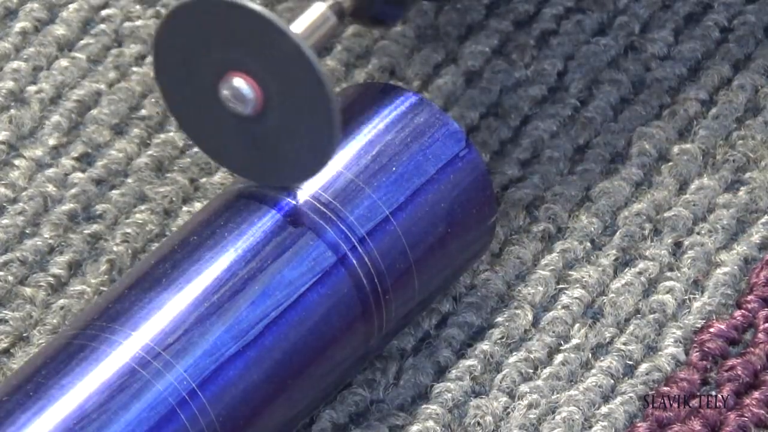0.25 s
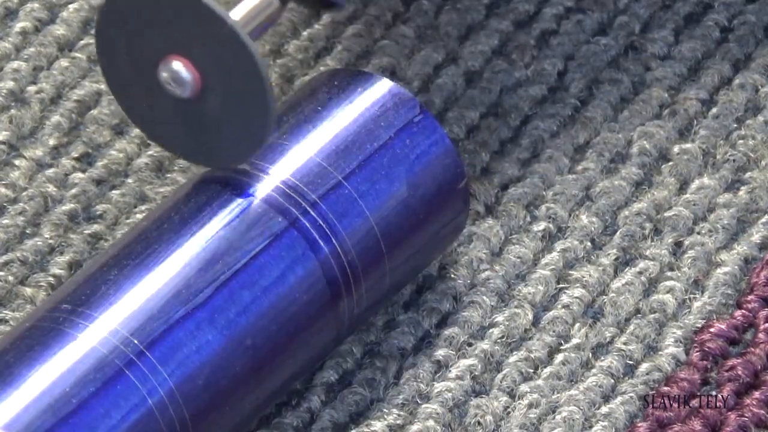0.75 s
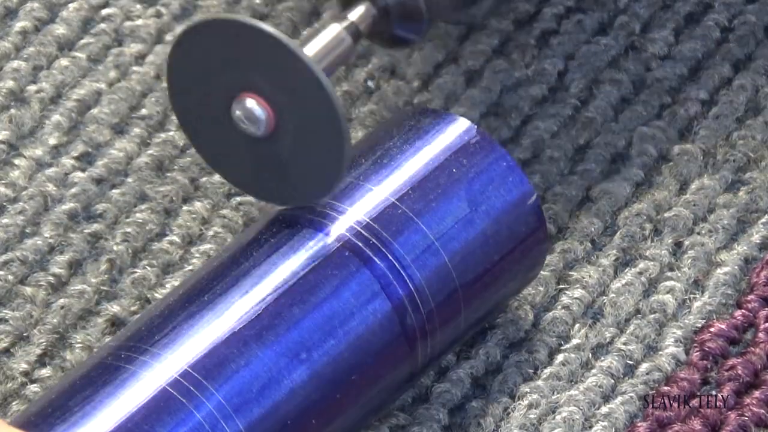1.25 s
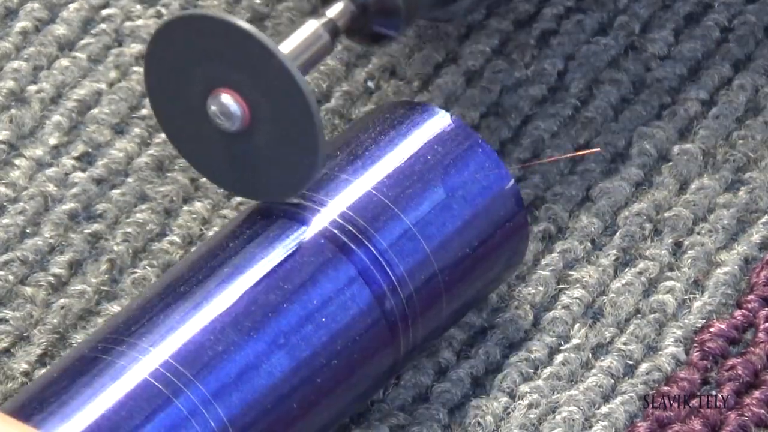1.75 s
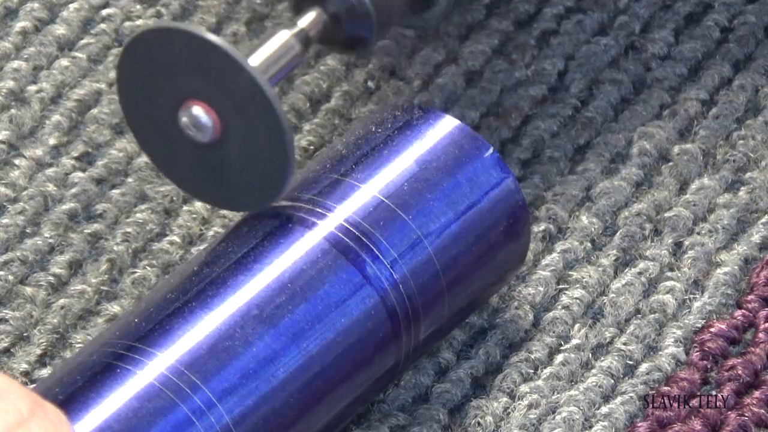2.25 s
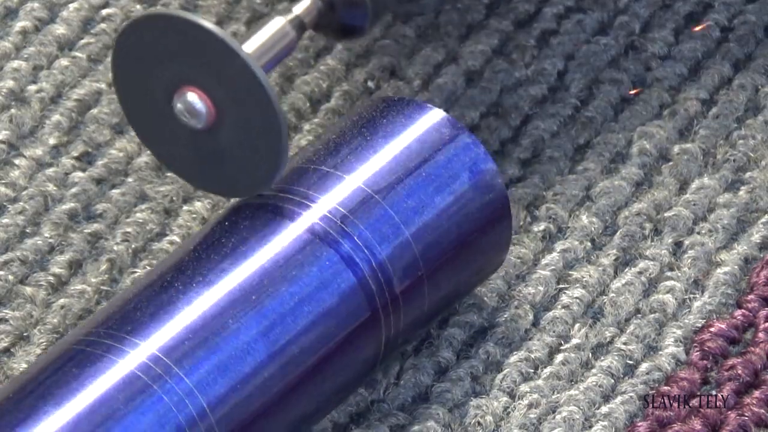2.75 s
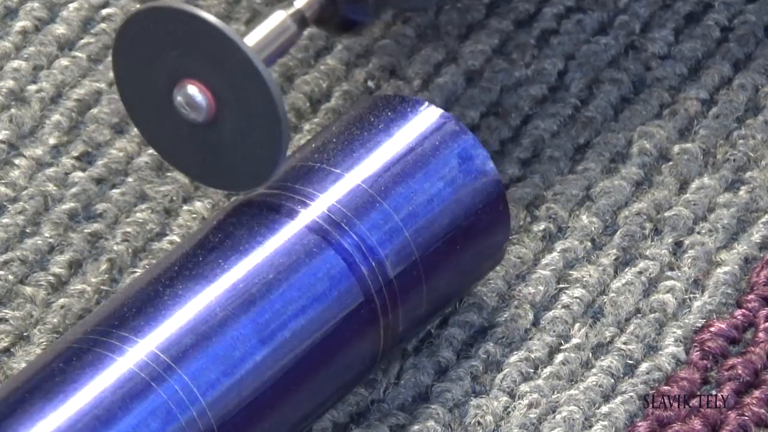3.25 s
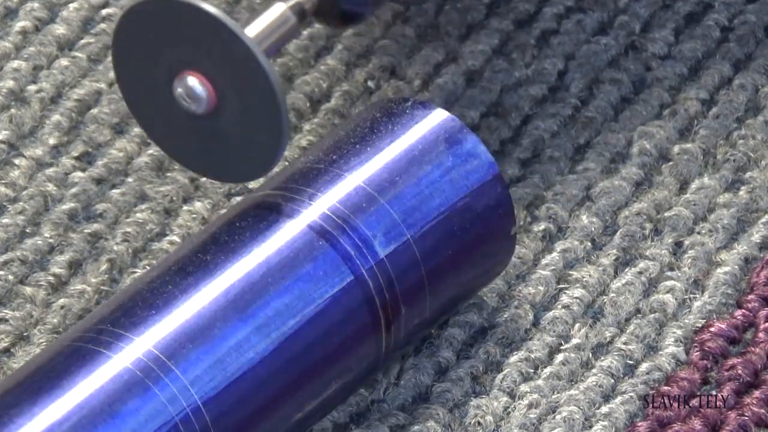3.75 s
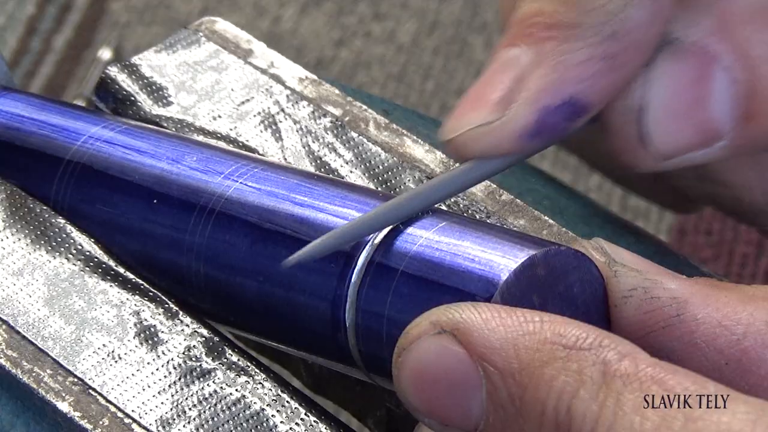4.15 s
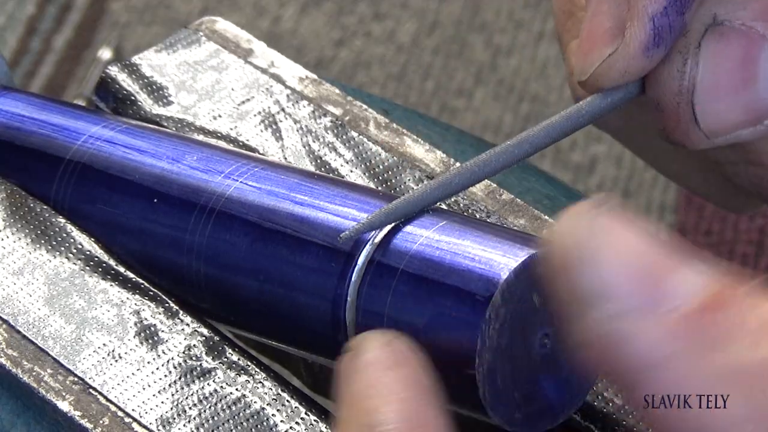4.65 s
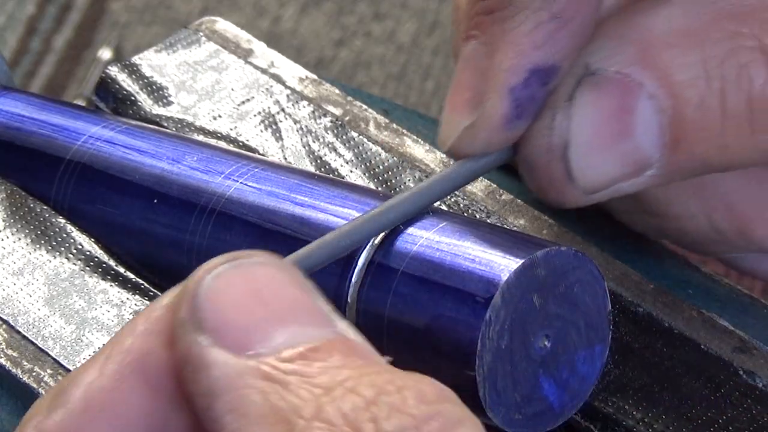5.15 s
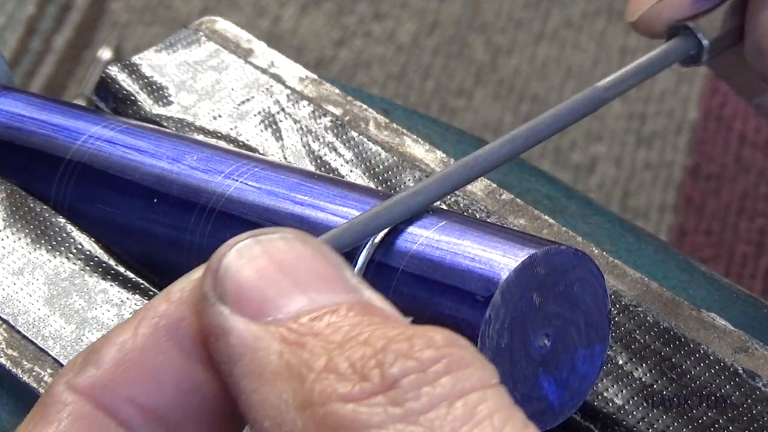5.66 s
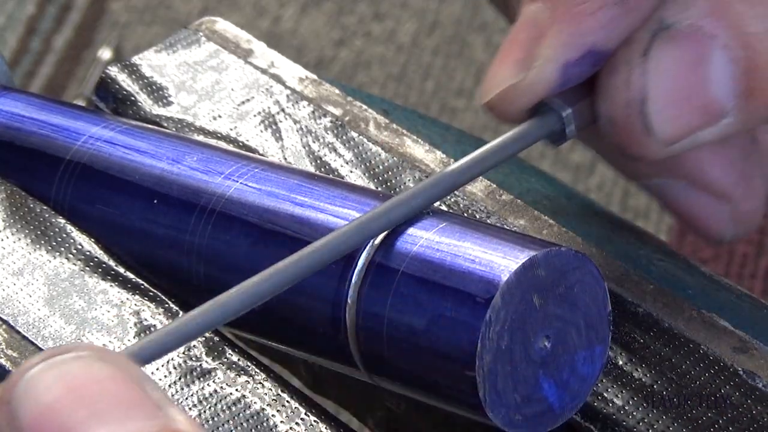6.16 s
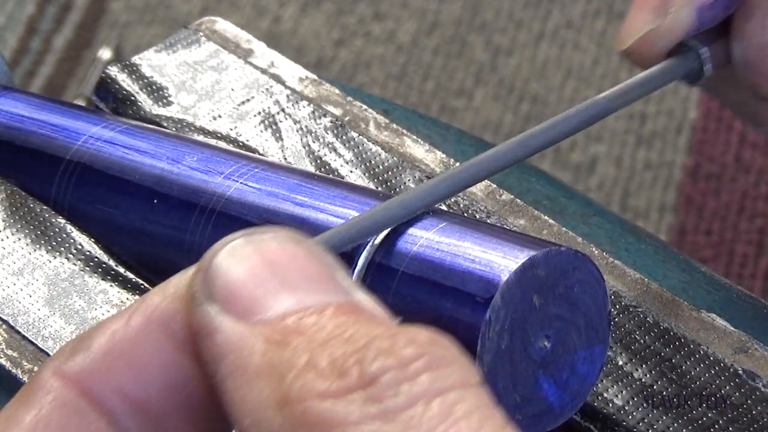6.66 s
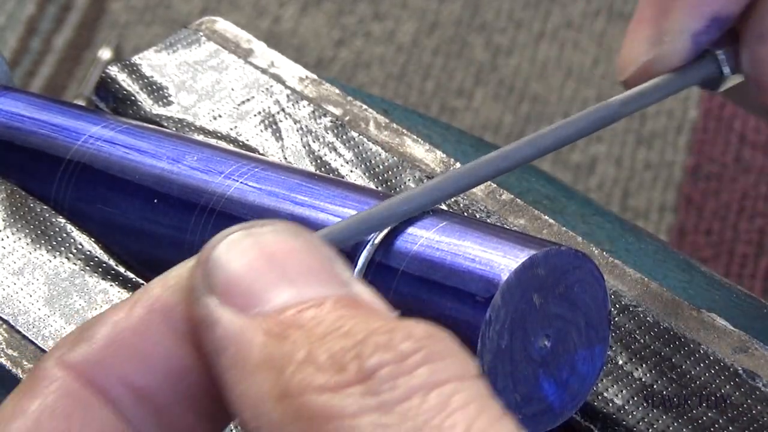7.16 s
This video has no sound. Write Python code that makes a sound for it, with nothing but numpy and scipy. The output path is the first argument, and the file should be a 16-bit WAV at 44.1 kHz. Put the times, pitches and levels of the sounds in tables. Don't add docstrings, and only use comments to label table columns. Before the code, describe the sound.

Close, piercing high-speed grinding with a wavering metallic whine cuts suddenly to quiet hand scraping on a steel bar, with clicks and low shop hum.

```python
import sys
import numpy as np
from scipy import signal
from scipy.fft import rfft, irfft, next_fast_len
from scipy.io import wavfile
from scipy.ndimage import uniform_filter1d

SR = 44100
rng = np.random.default_rng(int(sys.argv[2]) if len(sys.argv) > 2 else 0)


def undo_db(level):
    steps = np.asarray(level, float) / 20
    return 10 ** steps


def digitize_waveform(pressure):
    field = np.atleast_2d(pressure).T
    bounded = np.clip(field, -1, 1)
    quanta = np.round(bounded * 32767).astype(np.int16)
    wavfile.write(sys.argv[1], SR, quanta)


N = 325899
CUT_S = 4.192


def evened(x):
    return x / np.sqrt(np.mean(abs(x) ** 2) + 1e-20)


def read(points, hz):
    f, value = np.transpose(points)
    return np.interp(np.log(hz + 1), np.log(f + 1), value)


def curves(rows, t):
    s, *columns = np.transpose(rows)
    return [np.interp(t, s, c) for c in columns]


def add(mix, s, sound):
    part = mix[:, round(s * SR):][:, :sound.shape[1]]
    part += sound[:, :part.shape[1]]


def resonate(x, hz, width_hz, count=2):
    for _ in range(count):
        x = signal.lfilter(*signal.iirpeak(hz, hz / width_hz, SR), x)
    return x


def drift(t, per_s):
    at = np.arange(0, t[-1] + 1, 1 / per_s)
    return 1.39 * np.interp(t, at, rng.standard_normal(4000)[:len(at)])


def swells(rows, rest_db, t):
    coarse = t[::64]
    power = undo_db(rest_db) ** 2
    for peak_s, half_s, db in rows:
        power = power + undo_db(db - 9 * ((coarse - peak_s) / half_s) ** 2) ** 2
    return np.interp(t, coarse, np.sqrt(power))


def smeared(t, share):
    return np.sqrt(1 - share) + np.sqrt(share / 2) * (drift(t, 170) + 1j * drift(t, 170))


# frequency in Hz, likeness 0-1.
LIKENESS = [(60, 0.78), (180, 0.92), (550, 0.97), (1650, 0.97), (4970, 0.63), (15000, 0.42)]


def noise(spectrum, count, patchy_db):
    frames, hz = count // 128 + 5, np.fft.rfftfreq(512, 1 / SR)
    a, b, c, d, patches = rng.standard_normal((frames, 257, 5)).T
    patches = uniform_filter1d(patches, size=6, axis=0)
    patches = evened(uniform_filter1d(patches, size=12, axis=1))
    same = np.clip(read(LIKENESS, hz), -1, 1)[:, None]
    left = a + 1j * b
    z = np.array([left, same * left + np.sqrt(1 - same ** 2) * (c + 1j * d)])
    z *= undo_db(read(spectrum, hz)[:, None] + patchy_db * patches)
    return evened(signal.istft(z, nperseg=512, noverlap=384)[1][:, :count])


# frequency in Hz, t60 in seconds.
ROOM_T60 = [(300, 0.11), (1500, 0.026), (5000, 0.24), (12000, 0.19)]


def room(x, count):
    taps = np.zeros((2, 16000))
    at = np.arange(200, 15980, 20) + rng.integers(0, 20, (2, 789))
    np.put_along_axis(taps, at, rng.choice([-1., 1.], at.shape), 1)
    hz, t, z = signal.stft(taps, SR, nperseg=256)
    decay = undo_db(-60 * t / read(ROOM_T60, hz)[:, None])
    tail = signal.istft(z * decay, SR, nperseg=256)[1]
    return signal.fftconvolve(x[None], tail / np.linalg.norm(tail[0]), axes=1)[:, :count]


# peak in seconds, half length in seconds, chatter 0-1.
CHATTER_BOUTS = [(.93, .2, .5), (1.08, .14, .27), (1.6, .21, .42), (2.37, .11, .4), (2.69, .09, .45),
                 (3.04, .15, .4), (3.4, .25, .2), (3.63, .14, .65), (3.8, .14, .45), (4.16, .08, .75)]


def chattering(t):
    bouts = [top * (1 - abs(t - s) / half_s) for s, half_s, top in CHATTER_BOUTS]
    return np.max([.06 + 0 * t] + bouts, axis=0)


# peak in seconds, half length in seconds,
# swing in turns per s, rate in Hz.
SHAFT_SHUDDERS = [(.24, .06, 2.6, 37), (.5, .45, 2, 38), (.9, .24, 3, 26), (1.4, .1, 2, 22),
                  (1.62, .2, 5, 36), (1.93, .26, 1.8, 33), (2.42, .2, 2.4, 30), (2.7, .2, 2.4, 32),
                  (3.03, .25, 2.2, 36), (3.44, .16, 3.6, 36), (3.72, .22, 4.6, 35)]


def shudder(t):
    calm_turns_per_s = .4
    bouts = [top * (1 - ((t - s) / half_s) ** 2) for s, half_s, top, _ in SHAFT_SHUDDERS]
    swing = np.max([calm_turns_per_s + 0 * t] + bouts, axis=0)
    peak_s, _, _, rate_hz = np.transpose(SHAFT_SHUDDERS)
    cycles = np.cumsum(np.interp(t, peak_s, rate_hz)) / SR + .12 * drift(t, 6)
    return .78 * swing * np.sin(2 * np.pi * cycles)


# level in dB rms of shaft orders 1, 2, 3 ..
ORDER_DB = [-66, -58, -60, -48, -54, -51, -46, -48, -50, -45, -45, -46, -50, -53, -46, -47, -55, -58, -53,
            -55, -49, -52, -55, -56, -56, -56, -51, -56, -58, -58]
# start in seconds, end in seconds, order, level in dB rms.
HOUSING_SQUEAL_EVENTS = [(.1, .45, 2, -53), (.7, .91, 2, -49), (2, 2.7, 2, -53), (2.4, 2.9, 3, -54),
                         (2.9, 3.56, 3, -50), (3.7, 4.1, 3, -53), (2.12, 2.33, 17, -44), (.1, 1, 27, -46.5),
                         (1.7, 2.1, 27, -46), (2.6, 3, 27, -47.5), (3.83, 4.04, 17, -44),
                         (0.0, 0.22, 4, -43), (0.0, 0.29, 7, -37), (0.08, 0.19, 14, -31), (0.09, 0.21, 10, -40),
                 (0.25, 0.44, 4, -43), (0.46, 0.66, 10, -40), (0.69, 0.88, 10, -35), (0.74, 0.95, 9, -41),
                 (0.88, 1.0, 15, -39), (1.11, 1.4, 6, -45), (1.15, 1.3, 4, -43), (1.32, 1.4, 7, -38),
                 (1.45, 1.72, 14, -39), (1.46, 1.54, 4, -43), (1.5, 1.68, 11, -38), (1.65, 1.85, 5, -47),
                 (1.8, 1.97, 15, -37), (1.81, 2.15, 7, -36), (2.07, 2.16, 11, -38), (2.18, 2.49, 7, -37),
                 (2.24, 2.42, 16, -40), (2.27, 2.48, 5, -44), (2.37, 2.47, 6, -45), (2.38, 2.49, 11, -38),
                 (2.39, 2.66, 10, -37), (2.46, 2.6, 15, -39), (2.47, 2.57, 16, -38), (2.51, 2.68, 4, -43),
                 (2.52, 2.63, 11, -37), (2.57, 2.7, 7, -39), (2.6, 2.72, 14, -41), (2.79, 2.87, 15, -39),
                 (2.83, 3.2, 10, -37), (2.86, 3.03, 16, -38), (2.86, 3.16, 5, -47), (2.95, 3.16, 6, -46),
                 (3.0, 3.16, 15, -36), (3.06, 3.18, 16, -39), (3.16, 3.42, 11, -38), (3.2, 3.46, 10, -37),
                 (3.44, 3.57, 7, -37), (3.67, 3.88, 6, -44), (3.7, 3.87, 7, -39), (3.75, 3.87, 14, -41),
                 (3.8, 3.95, 15, -37), (3.82, 3.94, 16, -38), (3.91, 4.13, 6, -45), (3.98, 4.1, 7, -39),
                 (4.0, 4.09, 14, -37), (4.05, 4.12, 15, -38)]
RING_SQUEAL_EVENTS = [(0.27, 0.38, 22, -37), (0.27, 0.44, 25, -36), (0.29, 0.35, 24, -41),
                      (0.3, 0.4, 19, -41), (0.33, 0.55, 21, -32), (0.37, 0.52, 23, -30),
                      (0.38, 0.44, 24, -36), (0.41, 0.65, 22, -30), (0.43, 0.6, 20, -41),
                      (0.47, 0.67, 25, -37), (0.49, 0.67, 24, -39), (0.55, 0.66, 23, -37),
                      (0.58, 0.65, 21, -39), (0.6, 0.67, 26, -39), (0.96, 1.12, 23, -41),
                      (0.97, 1.12, 22, -37), (0.99, 1.13, 21, -36), (1.49, 1.74, 22, -36),
                      (1.69, 2.05, 25, -38), (1.83, 2.01, 19, -41), (1.84, 1.92, 22, -36),
                      (1.95, 2.04, 22, -36), (1.97, 2.09, 23, -35), (2.05, 2.35, 20, -43),
                      (2.06, 2.26, 21, -35), (2.08, 2.16, 25, -40), (2.14, 2.38, 23, -37),
                      (2.15, 2.31, 22, -34), (2.24, 2.35, 25, -38), (2.29, 2.51, 21, -41),
                      (2.48, 2.54, 25, -40), (2.48, 2.61, 26, -42), (2.49, 2.59, 23, -36),
                      (2.51, 2.66, 22, -34), (2.54, 2.67, 21, -39), (2.65, 2.91, 25, -42),
                      (2.69, 2.85, 22, -34), (2.69, 2.85, 23, -35), (2.7, 2.81, 21, -35),
                      (3.75, 3.82, 22, -38), (3.76, 4.09, 23, -35), (3.97, 4.08, 25, -41),
                      (4.01, 4.08, 26, -40), (4.01, 4.1, 24, -41), (4.03, 4.1, 22, -38)]


def order_level(coarse, order, rest_db):
    size = undo_db(rest_db + .3 + 2 * (order > 8) + 1.8 * drift(coarse, 7))
    for start_s, end_s, singer, db in HOUSING_SQUEAL_EVENTS + RING_SQUEAL_EVENTS:
        if singer == order:
            fade = np.clip(np.minimum(coarse - start_s, end_s - coarse) / .07 + .65, 0, 1)
            size = np.maximum(size, undo_db(db + 1.5 * (order > 6) + drift(coarse, 16)) * fade)
    return size


SLOT_SKIPS = [1.11, 1.155, 1.404, 1.45, 1.479, 1.508, 1.568, 1.655, 1.685]


def slot_tone(t, line, level):
    bloom = undo_db(-26.5) * resonate(line * np.minimum(t / 0.11, 1), 2514, 37)
    skip_s, skip_share = .006, .85
    skips = sum(np.exp(-((t - s) / skip_s) ** 2) for s in SLOT_SKIPS)
    return (level * line + bloom) * (1 - skip_share * skips)


# peak in seconds, half length in seconds, level in dB rms.
UNBALANCE_SWELLS = [(.05, 0.11, -50), (.73, 0.28, -49), (1.45, 0.42, -54), (2.0, 0.28, -56),
                    (2.46, 0.091, -53), (2.62, 0.13, -56), (3.0, 0.2, -48.5), (3.35, 0.27, -52),
                    (4.17, 0.066, -53)]
SLOT_SWELLS = [(.25, 0.049, -26.5), (.73, 0.11, -37.5), (.93, 0.083, -28.5), (1.06, 0.16, -32.5),
               (1.135, 0.022, -29), (1.2, 0.063, -34), (1.3, 0.068, -26.5), (1.43, 0.033, -26.5),
               (1.48, 0.045, -23.5), (1.53, 0.033, -40), (1.62, .05, -37), (1.77, 0.034, -30),
               (2.0, 0.28, -31.5), (2.46, 0.026, -29.5), (2.63, 0.048, -34), (2.89, 0.11, -28.5),
               (3.03, 0.065, -32), (3.55, 0.28, -37.5), (3.98, 0.14, -37)]
LOW_HOUSING_SWELLS = [(.01, 0.12, -36), (.27, 0.15, -34), (.62, 0.084, -36), (.85, 0.13, -33),
                      (1.13, 0.17, -37.5), (1.39, 0.041, -29.5), (1.58, 0.096, -24), (1.72, 0.09, -26.5),
                      (2.05, 0.31, -33.5), (2.52, 0.27, -33.5), (2.94, 0.079, -27.5), (3.16, 0.07, -27.5),
                      (3.4, 0.42, -32.5), (3.6, 0.084, -40), (3.7, 0.082, -35), (3.95, 0.22, -49)]
HIGH_HOUSING_SWELLS = [(.2, .1, -42), (.55, 0.21, -33), (1.03, 0.057, -40), (.85, 0.14, -33),
                       (1.5, 0.35, -41.5), (1.95, 0.14, -37), (2.42, 0.39, -33), (2.9, 0.22, -47),
                       (3.15, 0.42, -31), (3.64, 0.2, -30), (3.81, 0.058, -32), (3.97, 0.061, -23.5),
                       (4.05, 0.038, -37), (4.095, 0.014, -26)]
# shaft order, level in dB rms.
CAGE_TONES = [(5.44, -62), (7.615, -47), (8.385, -38), (8.8, -47), (15.6, -55), (16.4, -56)]


def motor(t, turns, speed, chatter):
    loose_grip = {1: swells(UNBALANCE_SWELLS, -66, t), 8: swells(SLOT_SWELLS, -42, t),
                  12: swells(LOW_HOUSING_SWELLS, -74, t), 13: swells(HIGH_HOUSING_SWELLS, -71, t)}
    out, coarse = 0, t[::64]
    for order, rest_db in enumerate(ORDER_DB, 1):
        steady_grip = np.interp(t, coarse, order_level(coarse, order, rest_db))
        level = loose_grip.get(order, steady_grip)
        share = .3 * chatter * min(order / 12, 1) ** 2 + .12 * (order > 18)
        line = smeared(t, share) * np.exp(2j * np.pi * (order * turns + rng.random()))
        line = line.real
        sound = slot_tone(t, line, level) if order == 8 else level * line
        lift_db = -2 * (order > 10) * np.clip((t - 4.11) / .03, 0, 1)
        out += sound * undo_db(lift_db)
    cage_turns = np.cumsum(speed) / SR
    for order, db in CAGE_TONES:
        out += undo_db(db + 2.6 * drift(t, 5.44)) * np.cos(2 * np.pi * order * cage_turns)
    return np.sqrt(2) * out


# start in seconds, end in seconds, ring level in dB, ring pitch in Hz.
DISC_TOUCHES = [(0, 0.057, -27, 7060), (0.273, 0.666, -26.5, 6900), (0.944, 1.12, -27, 7140),
                (1.475, 1.747, -27, 6900), (1.79, 2.39, -26.5, 7030), (2.46, 2.862, -26, 7100),
                (2.876, 3.11, -28, 7600), (3.77, 3.96, -34, 7000), (3.985, 4.088, -33, 6760)]


def touches(t):
    bite_s, lift_s, deepen_db, sag_hz = 0.055, 0.013, 0.5, 200
    size, hz = undo_db(-80) + 0 * t, 7000 + 0 * t
    for start_s, end_s, db, ring_hz in DISC_TOUCHES:
        way = np.clip((t - start_s) / (end_s - start_s), 0, 1) - .5
        fade = np.minimum((t - start_s) / bite_s + .5, (end_s - t) / lift_s + .5)
        size = size + undo_db(db + deepen_db * way) * np.clip(fade, 0, 1)
        hz = np.where(t > start_s - bite_s, ring_hz - sag_hz * way, hz)
    return size, hz


def disc(t, turns, speed, chatter, bite, ring_hz):
    ring, power = 0, 1e-9
    for order in range(19, 28):
        two_spots = 1 + .25 * np.exp(-2j * np.pi * .3 * (order - 22))
        size = two_spots * undo_db(2.5 * drift(t, 14))
        size = size / (1 + ((order * speed - ring_hz) / 720) ** 4)
        size *= order * speed < 8000
        line = smeared(t, .08 + .4 * chatter) * np.exp(2j * np.pi * order * turns)
        ring = ring + size * line
        power = power + abs(size) ** 2 / 2
    ring = ring.real / np.sqrt(power)
    octave = resonate(ring ** 2, 12500, 1500, count=3)
    octave = octave / np.sqrt(abs(uniform_filter1d(octave ** 2, size=2500)) + 1e-6)
    return bite * undo_db(-9.5 + 1.2 * drift(t, 12)) * (ring + undo_db(-7.5) * octave)


# frequency in Hz, width in Hz, level in dB
BAR_AND_FAN_MODES = [(2508, 13.5, -41), (3820, 440, -39), (3033, 180, -48.5), (2220, 600, -41.5), (4500, 420, -41),
                     (1145, 375, -46), (160.6, 104, -63), (8320, 2400, -44.5), (10290, 270, -54), (12200, 330, -54)]
# peak in seconds, half length in seconds, level in dB rms.
SPARK_FIZZ = [
    (2.2, 0.32, -38.5),
    (2.85, 0.37, -39.5),
]
EXIT_SQUEAK = [
    (4.118, 0.017, -28),
]


def steel_bar(t, turns, speed, chatter, bite):
    shake = rng.standard_normal(len(t)) * undo_db(6.3 * chatter)
    shake *= 1 + .5 * np.cos(2 * np.pi * turns)
    turned = shake + .5 * np.interp(t - 1 / speed, t, shake)
    out = 0
    for hz, width_hz, db in BAR_AND_FAN_MODES:
        source = turned if width_hz > 200 else shake
        out += undo_db(db + 1.55 * drift(t, 8)) * evened(resonate(source, hz, width_hz))
    out += undo_db(-12) * bite * evened(resonate(turned, 7100, 1700))
    out += swells(SPARK_FIZZ, -96, t) * evened(resonate(shake, 8700, 3200))
    return out + swells(EXIT_SQUEAK, -90, t) * evened(resonate(shake, 3660, 130))


# frequency in Hz, level in dB per Hz.
HISS_SPECTRUM = [(18, -64), (30, -42), (259, -15.5), (303, -44), (355, -21.5), (600, -15), (721, -14.5),
                 (1220, -11.5), (1720, -10), (2480, -4.5), (2830, -7), (6900, -4), (12600, -14.5),
                 (15000, -15), (15400, -63)]


def grinding_hiss(t, turns, speed, chatter):
    free_turns_per_s, db_per_turn = 328, 0.039
    level_db = -39 + db_per_turn * (free_turns_per_s - speed)
    level_db += 4 * np.exp(-((t - 3.68) / 0.22) ** 2)
    level_db -= 6.7 * np.clip((t - 4.1) / 0.15, 0, 1)

    def again(x):
        return np.array([np.interp(t - 1 / speed, t, side, left=0) for side in x])

    grit = noise(HISS_SPECTRUM, len(t), 2.7)
    grit = grit + .7 * (1 - chatter) * again(resonate(grit, 4500, 7000, count=1))
    grit = grit + .4 * (1 - chatter) * again(again(resonate(grit, 4500, 7000, count=1)))
    return undo_db(level_db + 7 - 3.7) * grit * (1 + .45 * np.cos(2 * np.pi * turns))


# time in seconds, turns per s.
SHAFT_SPEED = [(0.0, 311.3), (0.14, 313.3), (0.31, 313.2), (0.635, 300.8), (1.12, 316.4), (1.33, 313.4),
               (1.52, 318.8), (1.64, 318.2), (1.8, 312.0), (1.96, 310.6), (2.3, 302.6), (2.4, 301.9),
               (2.73, 305.4), (3.17, 298.2), (3.78, 303.3), (4.07, 294.2), (4.13, 304.5), (4.19, 308.5)]
# frequency in Hz, lead in radians.
LEFT_LEAD = [(3000, 0), (6000, .35), (10000, .2), (13100, 1.1), (15000, 2.2)]


def tool():
    t = np.arange(round(CUT_S * SR)) / SR
    speed = uniform_filter1d(curves(SHAFT_SPEED, t)[0], size=2000)
    turns = np.cumsum(speed + shudder(t)) / SR
    chatter = chattering(t)
    bite, ring_hz = touches(t)
    near = steel_bar(t, turns, speed, chatter, bite)
    near += motor(t, turns, speed, chatter)
    near += disc(t, turns, speed, chatter, bite, ring_hz)
    out = near * undo_db([[.2], [-.2]]) + undo_db(-12.5) * room(near, len(t))
    out += grinding_hiss(t, turns, speed, chatter)
    size = next_fast_len(len(t))
    lag = np.exp(-1j * read(LEFT_LEAD, np.fft.rfftfreq(size, 1 / SR)))
    out[1] = irfft(rfft(out[1], size) * lag, size)[:len(t)]
    return out * np.minimum((t[-1] - t) / 0.0042, 1)


# time in seconds, level in dB.
STROKE_PRESSURE = [(4.19, -37), (4.29, -42), (4.57, -39.5), (4.67, -42), (4.87, -42), (5.14, -39),
                   (5.31, -37.5), (5.59, -41), (5.78, -42.5), (6.05, -38.5), (6.35, -41), (6.57, -43),
                   (6.84, -39.5), (7.05, -39.5), (7.39, -38.5)]
# start in seconds, end in seconds, added amplitude in dB.
STONE_DRAGS = [
    (4.228, 4.366, -6),
    (4.784, 4.823, 4.5),
    (4.88, 4.902, -9),
    (5.925, 6.002, -6.5),
    (6.8, 6.857, -15),
]
# frequency in Hz, level in dB per Hz.
SCRATCH_SPECTRUM = [(180, -14.5), (300, -13), (462, -9.5), (701, -6), (1040, -6), (1300, -2), (1640, -7.5),
                    (2480, -8), (6000, -9.5), (10000, -22), (16000, -41)]


def stone(t):
    now_s = t + CUT_S
    stroke_db = curves(STROKE_PRESSURE, now_s)[0]
    grit_db = -46.5 + 0.37 * (stroke_db - stroke_db.mean()) + 7.8 * np.exp(-t / 0.016)
    press = sum(undo_db(db) * (abs(now_s - (a + b) / 2) < (b - a) / 2) for a, b, db in STONE_DRAGS)
    clumps = undo_db(1.28 * drift(t, 110) + 0.11 * drift(t, 30.6))
    clumps *= 1 + uniform_filter1d(press, size=150)
    rub = noise(SCRATCH_SPECTRUM, len(t), 0.75) * clumps
    low = signal.sosfilt(signal.butter(2, 3000, fs=SR, output="sos"), rub)
    scratch = undo_db(stroke_db + 2.5) * evened(low) + undo_db(grit_db + 3.5) * evened(rub - low)
    snaps = (rng.random(len(t)) < 22 / SR) * undo_db(3.1 * rng.standard_normal(len(t)))
    air_level = undo_db(-64.5) + undo_db(-47) * signal.lfilter([1], [1, -.992], snaps)
    air = air_level * rng.standard_normal((2, len(t)))
    return scratch + resonate(air, 9500, 11000, count=1)


# frequency in Hz, level in dB per Hz.
SHOP_SPECTRUM = [(15, -52), (28, -22), (69, -12), (102, 14), (214, 0), (409, 0), (462, -4), (701, -7),
                 (1000, -3), (1300, -13), (2200, -120)]


def shop_hum(count):
    return undo_db(-49.5 + 2) * noise(SHOP_SPECTRUM, count, 0.67)


def burst(db, hz, width_hz, t60_s, pan_db, crack=1.8):
    t = np.arange(6000) / SR
    rattle = rng.standard_normal((3, 6000)) * undo_db(-60 * t / np.clip(t60_s, .03, .3))
    rattle[0] *= 1 + crack * np.exp(-t / .0015)
    ring = resonate(rattle[0] + 0.4 * rattle[1:], hz, width_hz, count=3)
    return undo_db(db + pan_db * np.array([[.5], [-.5]])) * ring / abs(ring).max()


def ring_of(modes, db, hz):
    t = np.arange(6000) / SR
    rings = 0
    for share, mode_db, t60_s in modes:
        mode_hz = min(share * hz, SR / 3)
        rings = rings + undo_db(mode_db - 60 * t / t60_s) * np.sin(2 * np.pi * mode_hz * t)
    return undo_db(db) * np.minimum(t * hz, 1) * rings


# time in seconds, peak in dB, ring in Hz, top-end level in dB.
TICK_EVENTS = [(4.2728, -28, 2080, -38), (4.478, -32.5, 9000, -74), (4.5433, -22, 2030, -37.5),
               (4.638, -37, 10600, -43), (4.7332, -25, 4270, -43), (4.81, -27, 6200, -31.5),
               (4.8375, -29, 2700, -41), (4.929, -14.5, 3340, -26), (5.1385, -17, 3740, -37),
               (5.18, -25, 3130, -33.5), (5.324, -23, 3110, -30.5), (5.382, -30.5, 6200, -42),
               (5.4138, -27.5, 2820, -48), (5.636, -20, 3510, -37), (5.7245, -23.5, 2020, -55),
               (5.744, -27, 2100, -57), (5.83, -20, 4220, -34), (5.848, -24, 2560, -55),
               (5.9286, -21.5, 2250, -46), (6.0641, -31, 4300, -60), (6.1, -32, 4420, -63),
               (6.131, -16.5, 2280, -42), (6.137, -23, 2530, -55), (6.161, -27, 2500, -50),
               (6.265, -29, 2140, -42), (6.3968, -12, 2500, -18.5), (6.5297, -29.5, 2570, -35.5),
               (6.637, -25, 3230, -37), (6.706, -30.5, 5800, -50), (6.889, -24, 3770, -34.5),
               (6.936, -23.5, 2190, -43), (7.0604, -18, 4550, -28.5), (7.1073, -29.5, 2700, -38),
               (7.155, -37, 4500, -51), (7.23, -12, 4280, -33)]
# time in seconds, top-end level in dB.
GRAZE_EVENTS = [(4.5878, -35.5), (5.651, -32.5), (4.783, -34), (4.8735, -36), (4.979, -33), (6.154, -38),
                (6.6187, -41), (7.1876, -40)]
# share of the ring frequency, level in dB, t60 in seconds.
STEEL_MODES = [(1.0, -0.5, 0.036), (1.43, -2.5, 0.022), (1.9, -5.5, .03)]


def ticks(out):
    grazes = [(s, top_db + 5, 2500, top_db) for s, top_db in GRAZE_EVENTS]
    for s, db, hz, top_db in TICK_EVENTS + grazes:
        t60_s = 0.17 + .002 * db
        tick = burst(db - 0.5, hz, hz, t60_s, 1.1)
        spray = burst(top_db + 8.5, 5440, 8300, 0.84 * t60_s, 1.7)
        add(out, s, tick + ring_of(STEEL_MODES, db - 9.5, hz) + spray)


# time in seconds, peak in dB, ring in Hz, thud level in dB.
KNOCK_EVENTS = [(4.305, -26, 1917, -40), (4.781, -27, 1234, -33.5), (4.872, -28, 1230, -42),
                (4.927, -24, 1793, -62), (4.952, -26.5, 1510, -64), (4.982, -32, 1530, -61),
                (5.67, -31, 1240, -50), (5.723, -21.5, 1836, -43), (5.848, -38, 1410, -35),
                (5.928, -20.5, 1263, -41), (5.9341, -23, 990, -28), (6.1, -36, 1280, -44),
                (6.198, -34, 1400, -34.5), (6.3962, -7.5, 1308, -25.5), (6.406, -17, 1290, -45),
                (6.992, -26, 1290, -46), (7.106, -35, 1360, -36.5), (7.172, -31, 1210, -52)]
# share of the ring frequency, level in dB, t60 in seconds.
REST_MODES = [(.2, -15, .08), (.44, -12, 0.11), (.83, -3, 0.13), (.89, -6, 0.21), (1.0, -0.5, .15),
              (1.07, 7, 0.057), (1.9, -17, .1)]


def knocks(out):
    for s, db, hz, thud_db in KNOCK_EVENTS:
        t60_s = 0.22 + .002 * db
        knock = burst(db - 7, hz, 790, t60_s, .6, crack=0.43)
        thud = burst(thud_db + 9, 633, 1160, t60_s, 0.55, crack=0.45)
        add(out, s, knock + ring_of(REST_MODES, db - 13, hz) + thud)


def hits():
    out = np.zeros((2, N))
    ticks(out)
    knocks(out)
    return out + undo_db(-15) * room(out.mean(0), N)


def scene():
    mix = hits()
    t = np.arange(N - round(CUT_S * SR)) / SR
    add(mix, CUT_S, stone(t) + shop_hum(len(t)))
    mix[1] = np.roll(mix[1], 1)
    add(mix, 0, tool())
    return mix


def roll_off(x):
    return signal.sosfilt(signal.butter(12, 16470, fs=SR, output="sos"), x)


def record(dry):
    band = signal.butter(3, 40, "highpass", fs=SR, output="sos")
    edge = signal.firwin(255, 16400, window=("kaiser", 8), fs=SR)
    heard = signal.sosfilt(band, dry * undo_db([[.2], [-.2]]))
    mix = signal.oaconvolve(heard, edge[None], "same")
    return roll_off(mix)


dry = scene()
out = record(dry)
digitize_waveform(out)
```